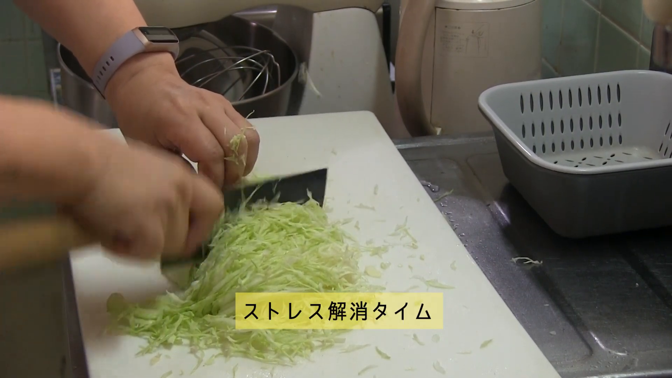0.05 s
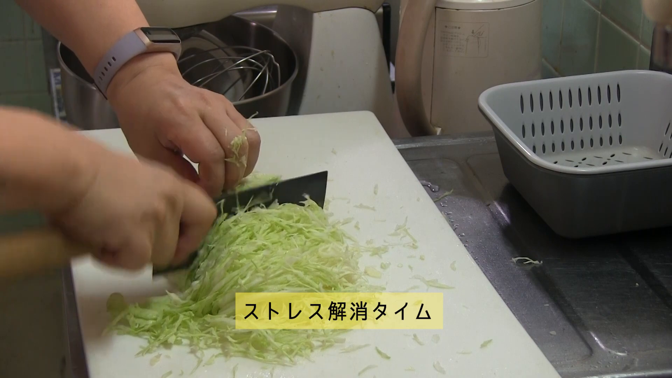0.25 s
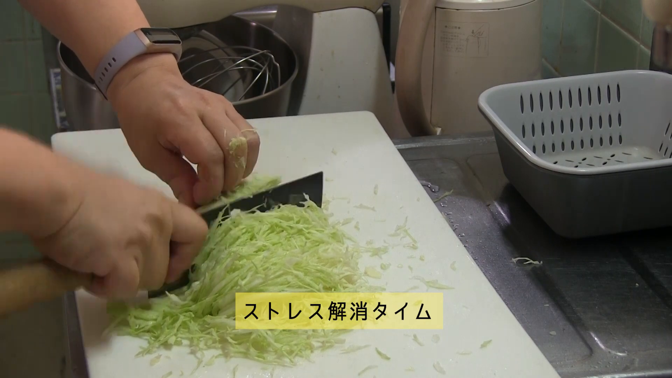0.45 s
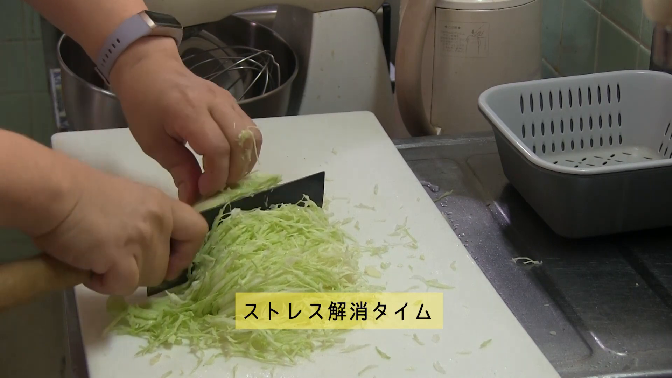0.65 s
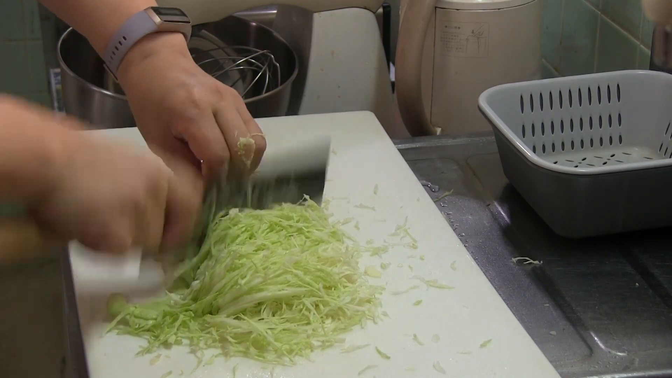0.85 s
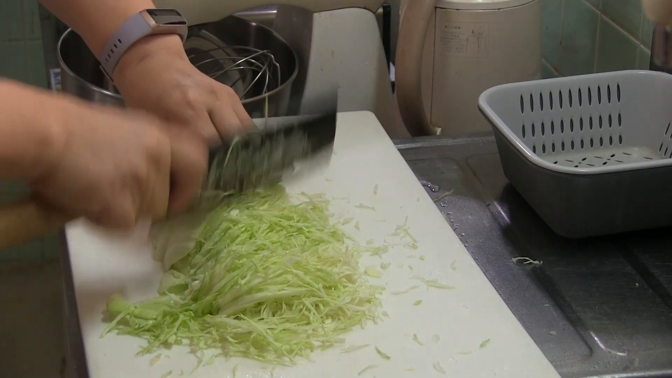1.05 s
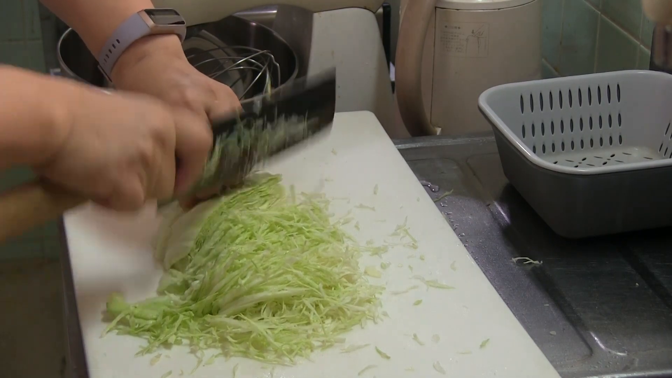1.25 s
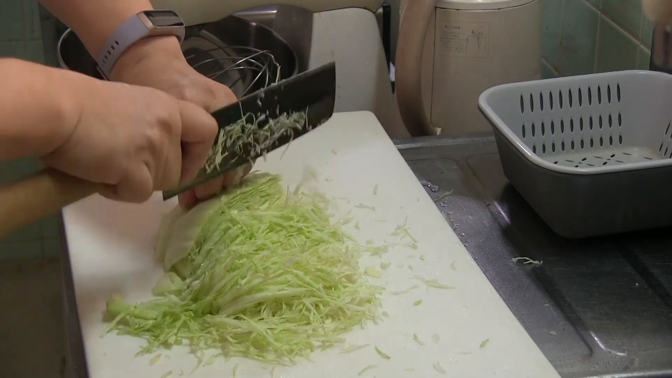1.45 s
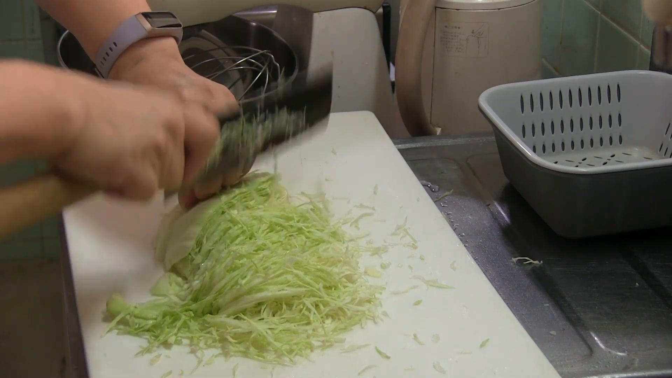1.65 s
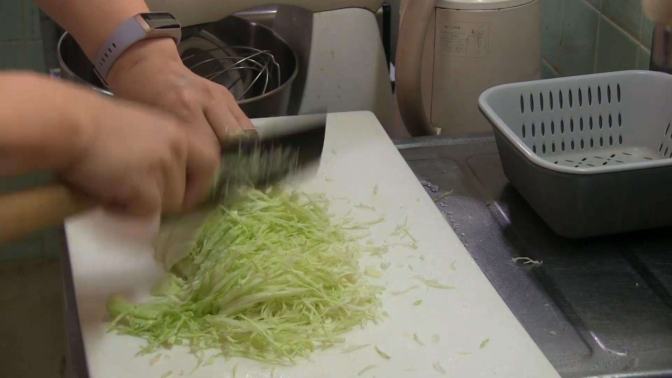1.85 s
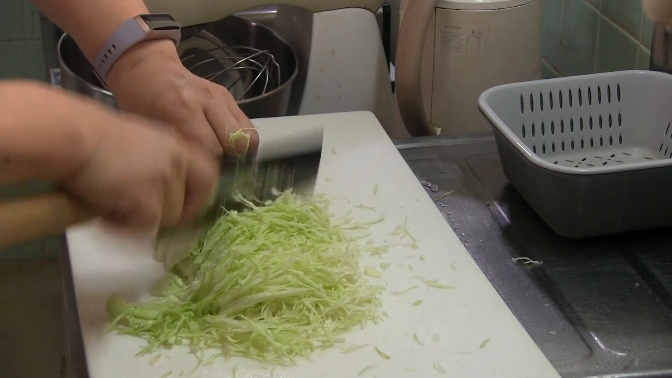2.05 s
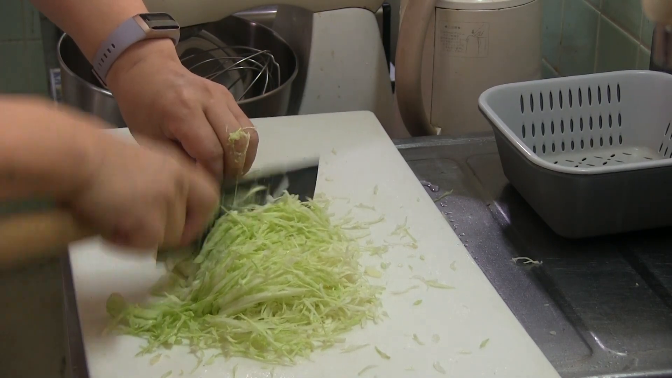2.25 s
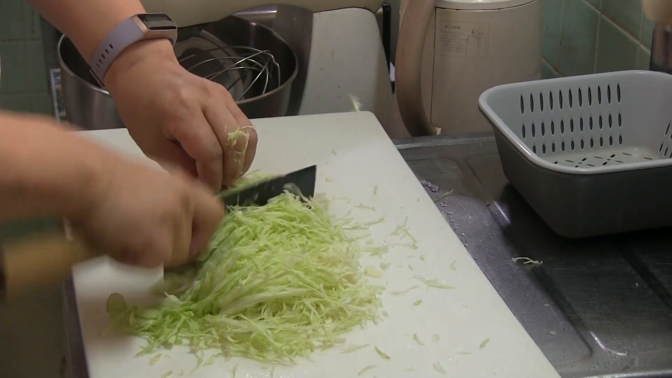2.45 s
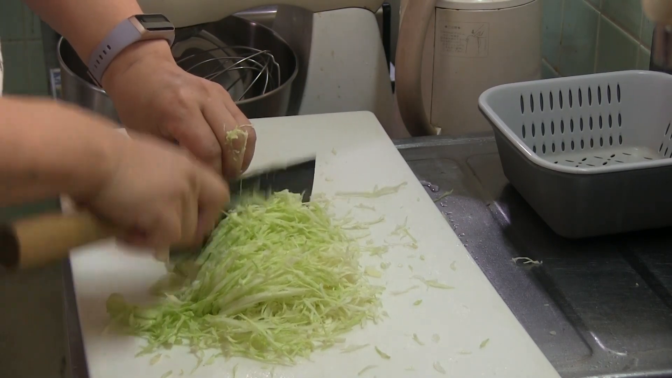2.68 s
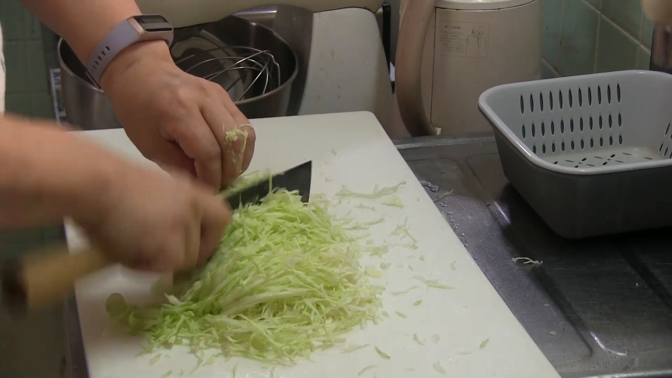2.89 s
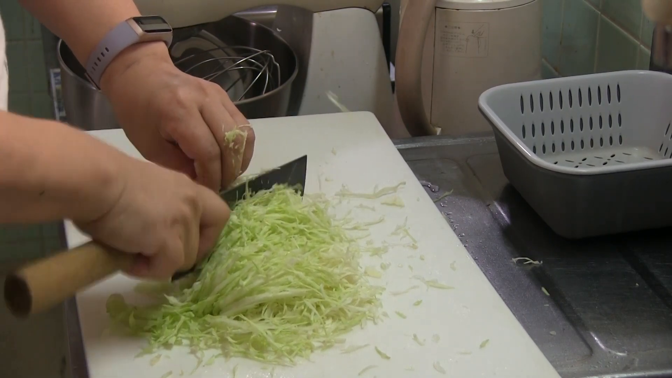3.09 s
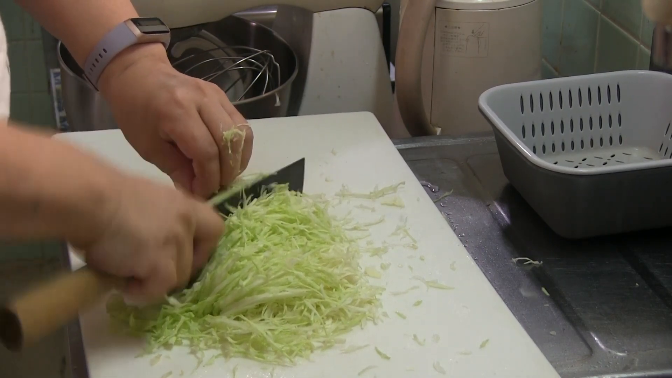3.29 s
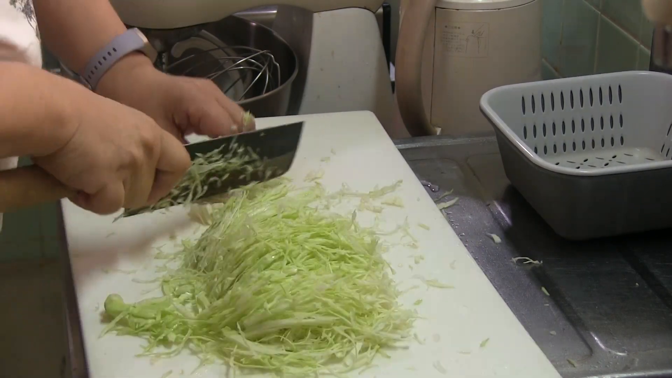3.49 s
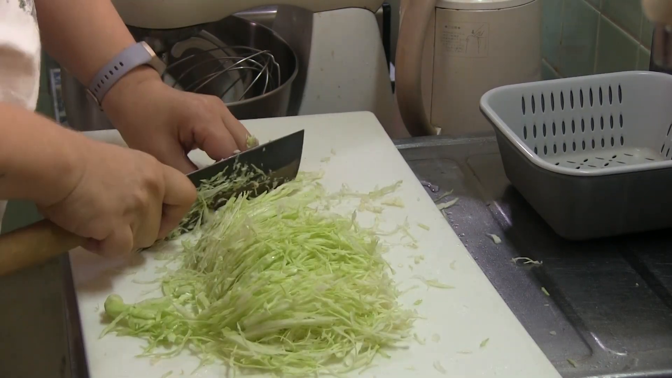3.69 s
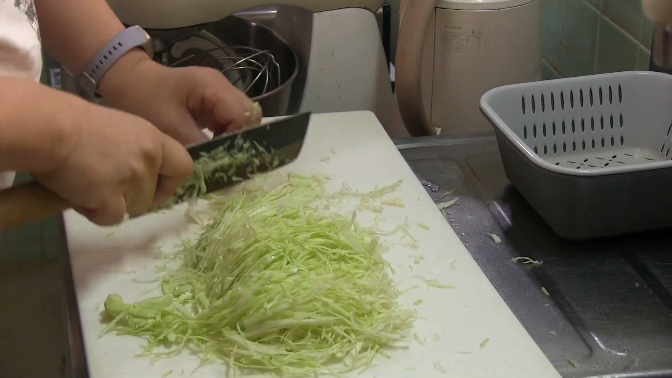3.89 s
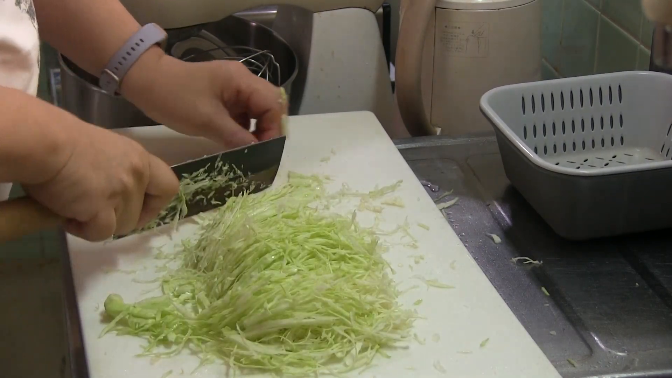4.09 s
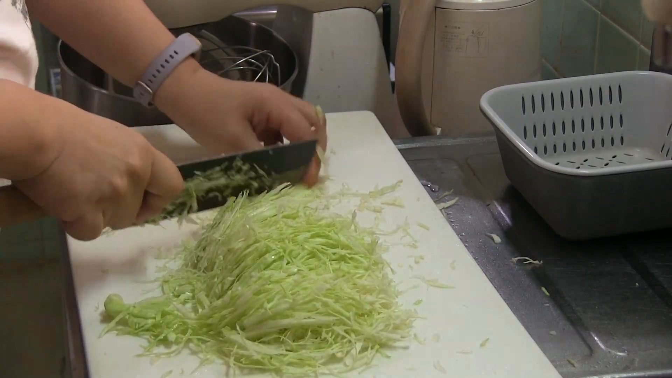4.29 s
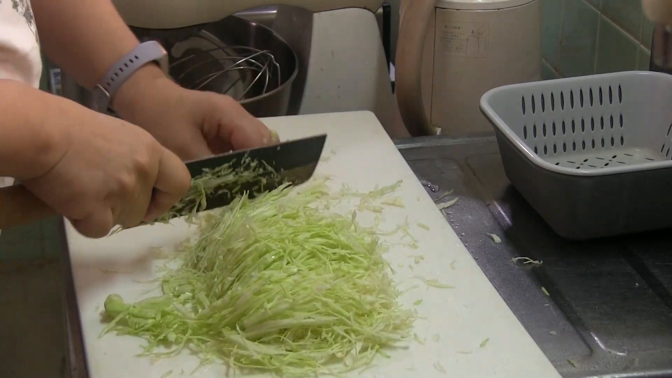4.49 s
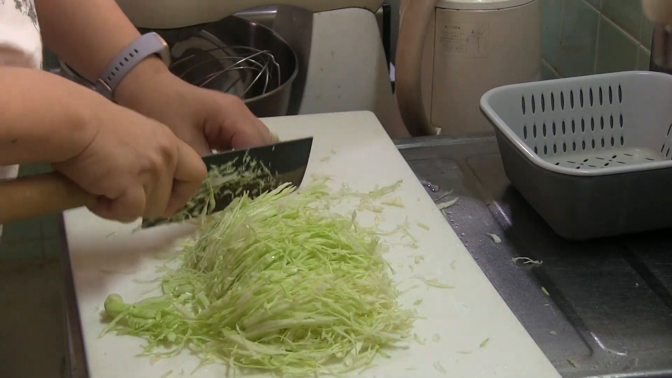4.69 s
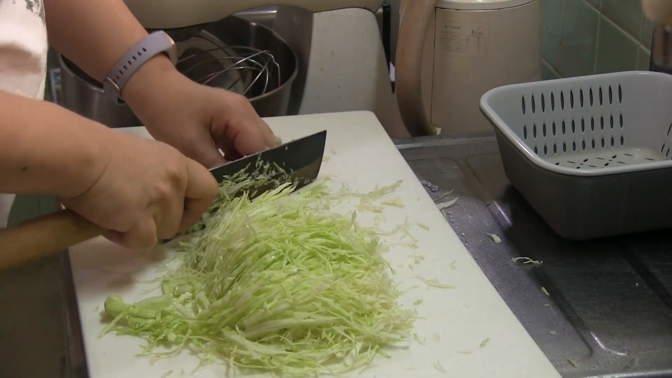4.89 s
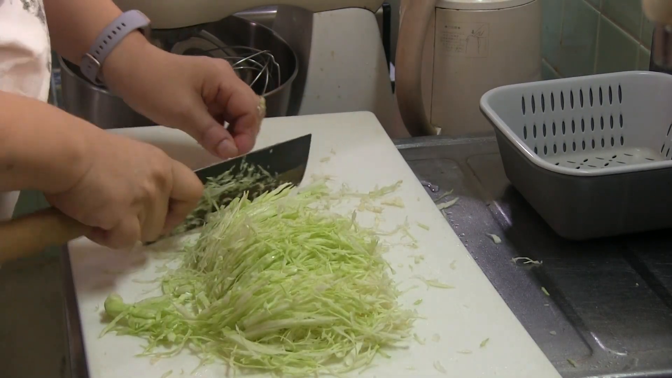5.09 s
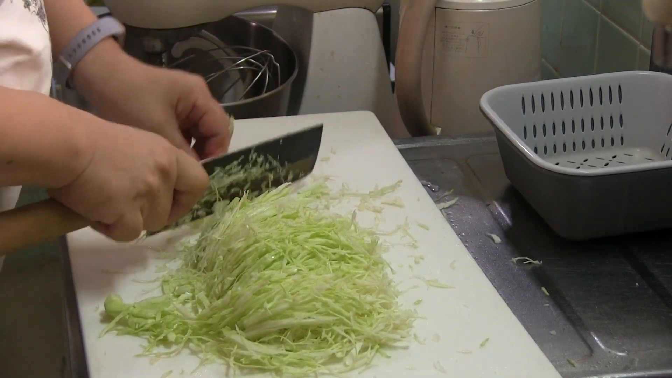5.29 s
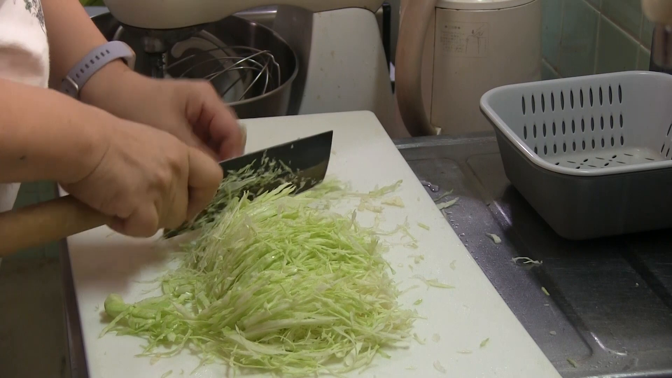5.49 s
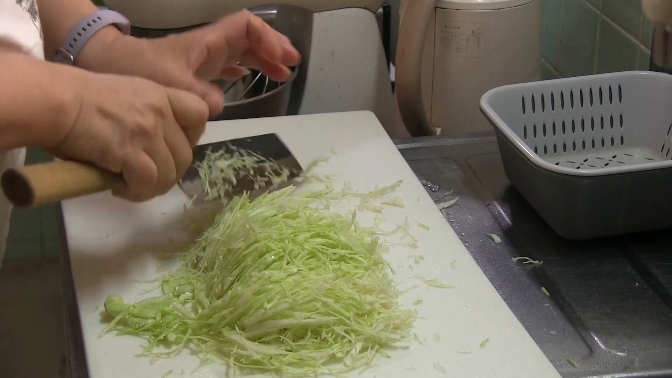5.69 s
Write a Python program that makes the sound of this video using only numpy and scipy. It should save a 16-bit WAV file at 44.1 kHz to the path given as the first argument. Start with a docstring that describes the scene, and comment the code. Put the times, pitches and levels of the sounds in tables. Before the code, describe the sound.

Close, wide stereo pickup in a small hard-walled kitchen: a broad cleaver chops cabbage at four to five strokes a second, each a short crackling crunch ending in a loud hollow plastic knock. One beat is skipped early on and one stroke stalls late. The ring is cut off abruptly, the background rises, and a few weaker knocks, soft bumps and crisp rustles follow before the room noise drops.

```python
"""A cleaver shreds cabbage on a plastic board in a small kitchen, four to five strokes a second.
Each stroke is a burst of crackling crunch, then a knock: board modes, noise chatter and an edge click.
Shreds rustle in finer crackle as the blade lifts; now and then the rubbed steel sings a wavering tone.
The chopping is cut off mid-ring; a few slower knocks and soft low bumps follow as shreds are gathered.
Shaped noise and a low hum make the background; its level steps up at the cutoff and later back down."""
import sys
import numpy as np
from scipy import signal
from scipy.fft import rfft, irfft, next_fast_len
from scipy.io import wavfile
from scipy.ndimage import uniform_filter1d

SR = 44100
rng = np.random.default_rng(int(sys.argv[2]) if len(sys.argv) > 2 else 0)


def to_wav(s):
    """Save 16-bit WAV."""
    ch = np.atleast_2d(s).T  # columns
    pcm = np.round(np.clip(ch, -1, 1) * 32767)  # PCM
    wavfile.write(sys.argv[1], SR, pcm.astype(np.int16))


N = 253124  # length in samples
CUTOFF_S = 3.456  # the sound is cut here, clipping the ring of the last stroke
CHOP_RING, HELD_RING = 0.67, 0.39  # share of the board's free ring; pressure shortens it further
CHOP_BRIGHT_DB = -0.4  # treble of a chopping knock
CHOP_CLICK_DB, HELD_CLICK_DB = -6.5, -17  # edge click over the knock, for a full cut and a held blade
FULL_CUT_DB = -31.5  # crunch level of a full cut
THIN_CUT_CLICK = 0.24  # a thin cut cushions less: dB of extra click per dB below a full cut
THIN_CUT_DULLING = 0.4  # it is also duller: dB of extra body per dB below a full cut

# strokes of the cleaver; the one at 3.205 s stalls in the leaves
# (t/s at the bottom, knock level/dB, cutting time/s, crunch level/dB)
CLEAVER_STROKES = [(-.125,-10.5,0.066,-36), (0.0962,-13.5,0.043,-38), (0.3274,-14.5,0.055,-36),
                   (0.5504,-12,0.047,-37), (0.9848,-12,0.017,-47), (1.2091,-13,.033,-42.5),
                   (1.4195,-12,0.038,-52.5), (1.639,-12.5,0.034,-38.5), (1.8953,-13.5,0.071,-34),
                   (2.0732,-12,0.023,-42.5), (2.2885,-11.5,0.029,-43.5), (2.5162,-13.5,.037,-37.5),
                   (2.752,-16.5,0.06,-36), (2.9559,-13,.034,-38.5), (3.205,-40,0.063,-32.5),
                   (3.3915,-12,0.031,-39)]
# blade set down and held against the board: (t/s, knock level/dB, brightness/dB)
HELD_KNOCKS = [(4.126,-16.3,-14), (4.8137,-20.5,-25), (5.1662,-17.5,-4)]


def chops():
    """Knocks of the blade on the board, sharing part of the walls' answer; a held blade damps the ring more."""
    out = np.zeros((2, N))
    usual = walls(ROOM_WIDTH, gap=.024)
    for bottom_s, level_db, _, crunch_db in CLEAVER_STROKES:
        click_db = CHOP_CLICK_DB + THIN_CUT_CLICK * (FULL_CUT_DB - crunch_db)
        blow = knock(usual, CHOP_RING, CHOP_BRIGHT_DB, click_db)
        add(out, bottom_s, amp(level_db) * blow)
    for start_s, level_db, bright_db in HELD_KNOCKS:
        blow = knock(usual, HELD_RING, bright_db, HELD_CLICK_DB)
        add(out, start_s, amp(level_db) * blow)
    return out


ROOM_WIDTH = .55  # side over mid in the answer to a knock
SWING_DB = 2.5  # first swing of the board, before the blow is levelled
# the board's radiation: (f/Hz, left minus right level/dB)
BOARD_LEAN = [(100, -1), (170, 3), (300, -2), (600, -2.5), (1200, 1), (2500, 1)]


def knock(usual, ring, bright_db, click_db):
    """One blow of the edge on the board with the walls' answer; rms 1 over its first 40 ms, plus the click."""
    t = clock()
    blow = board(ring, scatter_db=1.92, push_hz=847, push_db=SWING_DB) + chatter(ring)
    blow = filtered(blow, lambda f: shelf(f, 1380, bright_db) * 1j * f / (1j * f + 70))
    # part of the answer repeats at every blow, part is new
    answer = amp(-13.5) * usual + amp(-9.7) * walls(ROOM_WIDTH, gap=.028)
    blow = blow + signal.fftconvolve(blow, answer, axes=1)[:, :len(t)]
    blow = filtered(blow, lambda f: amp(stereo(0, along(BOARD_LEAN, f) / 2)))
    blow = blow / np.sqrt(np.mean(blow[:, t < .04] ** 2))

    noise = rng.standard_normal(len(t)) * amp(-60 * t / 0.011)
    click = filtered(noise, lambda f: 1 / (1 + 1j * f / 3300) / (1 + 1j * f / 14000))
    return blow + amp(click_db) * in_room(click, walls(width=0.13, gap=0.00059))


# modes of the board and the counter beneath it: (f/Hz, relative level/dB, free-ringing t60/s)
BOARD_MODES = [(145, -33, .22), (186, -27, .36), (206, -25, .19), (238, -25, .15), (282, -23, .17),
               (306, -17, .12), (344, -20, .12), (395, -35, .25), (455, -18, .11), (500, -19, .13),
               (567, -13, .12), (601, -18, .11), (652, -13, .08), (675, -16, .15), (721, -33, .11),
               (780, -15, .1), (895, -21, .07), (1010, -18, .075), (1099, -32, .08), (1165, -20, .045),
               (1236, -22, .07), (1356, -21, .06), (1455, -19, .11), (1540, -24, .05), (1640, -22, .04),
               (1860, -33, .05), (1975, -29, .06), (2420, -30, .025), (2750, -29, .045)]


def board(ring, scatter_db, push_hz, push_db):
    """A single swing of the board under the blade, then its modes, alternate ones in opposite sense."""
    t = clock()
    hz, db, t60 = np.transpose(BOARD_MODES)[:, :, None]
    size, detune = rng.standard_normal((2, len(BOARD_MODES), 1))
    sense = np.cos(np.pi * np.arange(len(BOARD_MODES)))[:, None]
    decay = amp(db + scatter_db * size - 60 * t / (ring * t60))
    tones = np.sin(2 * np.pi * hz * (1 + .003 * detune) * t)
    modes = (sense * decay * tones).sum(0)
    u = t * push_hz * np.pi * np.sqrt(2) - np.pi
    swing = -amp(push_db) * u * np.exp(-u * u)
    return modes * (1 - np.exp(-t / 0.0038)) + swing


CHATTER_DB = -16  # starting rms, before the blow is levelled
# dense ring of board and blade: (f/Hz, relative level/dB per Hz)
CHATTER_SPECTRUM = [(100, -32.5), (180, -1), (280, -4.5), (500, -2), (800, -1.5), (1500, -6), (1750, -10),
                    (2200, -15.5), (3000, -19), (4500, -30), (9000, -47.5)]


def chatter(ring):
    """Countless short-lived modes of board and blade, as decaying noise that differs at every blow."""
    t = clock()
    noise = rng.standard_normal((2, len(t)))
    mid, side = filtered(noise, lambda f: amp(along(CHATTER_SPECTRUM, f)))
    attack = 1 - np.exp(-t / 0.00045)
    decay = amp(CHATTER_DB - 60 * t / (0.18 * ring))
    return unit(stereo(mid, ROOM_WIDTH / 2 * side)) * attack * decay


# leaves giving way under the edge: (f/Hz, relative level/dB per Hz)
CRUNCH_SPECTRUM = [(40, -3), (130, 6), (250, 12), (500, 5), (1500, 8.5), (2500, 4), (4500, 2.5),
                   (8000, -1.5), (12000, -3.5), (16000, -15.5)]


def cabbage():
    """Dense crunch on the way down to every knock; thin cuts are quieter and duller."""
    out = np.zeros((2, N))
    for bottom_s, _, length, level_db in CLEAVER_STROKES:
        dull_db = THIN_CUT_DULLING * (FULL_CUT_DB - level_db)
        crunch = crackle(length, CRUNCH_SPECTRUM, rate=4500, rise=0.012)
        # lift the body and leave the top treble where it is
        crunch = filtered(crunch, lambda f: amp(dull_db) * shelf(f, 9100, -dull_db))
        answer = amp(-5.5) * walls(width=0.8, gap=0.00033)
        add(out, bottom_s - length, amp(level_db) * in_room(crunch, answer))
    return out


CELL_SPREAD_DB = 3.3  # how unequal the bursts are


def crackle(length, spectrum, rate, rise):
    """Cells burst at random, in clumps, while the blade moves; rms 1 above 5 kHz before the envelope."""
    t = clock()
    bursts = (rng.random(len(t)) < rate / SR) * rng.choice([-1, 1], len(t))
    clumps = unit(uniform_filter1d(rng.standard_normal(len(t)), size=260))
    spread = np.clip(rng.standard_normal(len(t)), -2, 2)
    cells = bursts * amp(CELL_SPREAD_DB * spread + 2 * clumps)
    colour = lambda f: amp(along(spectrum, f))
    treble = filtered(cells, lambda f: colour(f) * (f > 5000))
    stroke = np.clip(t / rise, 0, 1) * np.exp(-np.maximum(t - length, 0) / 0.002)
    return filtered(cells * stroke, colour) / treble.std()


LIFT_SHARE, LIFT_S = .37, 0.026  # the blade rises this far on to the next stroke, for this long
LIFT_DB, LIFT_BRIGHT_DB = -51.5, -11  # rustle of the lift and its treble
# loose shreds brushed by blade or fingers: (t/s, length/s, level/dB, brightness/dB)
BRUSHED_SHREDS = [(0.858,0.031,-54.5,-10), (1.058,0.013,-42.5,-13), (3.652,0.011,-47,3), (3.715,.04,-59,13),
                  (3.75,0.045,-46,12), (4.119,0.01,-49.5,5), (4.807,0.052,-51,7), (4.85,.056,-48,2),
                  (5.183,0.013,-44.5,9), (5.433,.011,-43.5,2.5)]
# colour of the rustle before brightness: (f/Hz, relative level/dB per Hz)
SHRED_SPECTRUM = [(100, 6), (400, 0), (1500, 2), (2500, -5.5), (4500, -5.5), (8000, -7), (12000, -9),
                  (16000, -20)]


def shreds():
    """Loose shreds crackle finely as the blade lifts between strokes, and when they are gathered."""
    out = np.zeros((2, N))
    times = [stroke[0] for stroke in CLEAVER_STROKES]
    lifts = []
    for bottom_s, following in zip(times, times[1:]):
        lift_s = bottom_s + LIFT_SHARE * (following - bottom_s)
        lifts.append((lift_s, LIFT_S, LIFT_DB, LIFT_BRIGHT_DB))
    for start_s, length, level_db, bright_db in lifts + BRUSHED_SHREDS:
        rustle = crackle(length, SHRED_SPECTRUM, rate=3400, rise=0.0067)
        rustle = filtered(rustle, lambda f: shelf(f, 9200, bright_db))
        add(out, start_s, amp(level_db) * in_room(rustle, walls(width=0.51, gap=0.00065)))
    return out


# soft bumps on the board: (t/s, relative level/dB)
SOFT_BUMPS = [(3.805, -10), (3.82, -13), (4.86, -8.5), (4.922, -12)]


def bumps():
    """Soft contact wakes only the low modes of the board."""
    out = np.zeros((2, N))
    for start_s, level_db in SOFT_BUMPS:
        thud = board(ring=.6, scatter_db=3, push_hz=260, push_db=4)
        thud = filtered(thud, lambda f: (1j * f / (1j * f + 80)) ** 2 / (1 + 1j * f / 340) ** 2)
        answer = amp(-3.5) * walls(width=0.11, gap=0.014)
        add(out, start_s, amp(level_db) * in_room(thud, answer))
    return out


# the steel sings as it rubs the leaves: (t/s, f/Hz, level/dB)
STEEL_SINGS = [(.862, 4520, -53), (1.092, 4500, -49)]


def blade():
    """A thin, wavering note of the rubbed steel: a swelling and fading sine with randomly drifting phase."""
    out, t = np.zeros((2, N)), clock()
    for start_s, hz, level_db in STEEL_SINGS:
        phase = 2 * np.pi * hz * t + 0.077 * np.cumsum(rng.standard_normal(len(t)))
        u = t / .016  # the swell peaks at 16 ms
        note = amp(level_db) * u * np.exp(1 - u) * np.sin(phase)
        add(out, start_s, in_room(note, amp(-9) * walls(width=0.55, gap=0.0038)))
    return out


BACKGROUND_DB, SECTION_RISE_DB = -48, 5  # the steady rush, and its step up at the cutoff
SECTION_END_S = 5.14  # it steps back down here
# rush of the kitchen: (f/Hz, relative level/dB per Hz)
RUSH_SPECTRUM = [(20, -12), (60, -2), (85, -11.5), (130, -2.5), (280, -2), (500, -5.5), (900, -10),
                 (1500, -15.5), (2300, -19), (4500, -28), (8000, -30), (12000, -35), (16000, -39)]


def background():
    """Steady noise rush with a low, slightly unsteady appliance hum; both are louder in the middle section."""
    t = np.arange(N) / SR
    noise = rng.standard_normal((2, N))
    mid, side = filtered(noise, lambda f: amp(along(RUSH_SPECTRUM, f)))
    # the lows are narrower than the highs
    side = 0.49 * filtered(side, lambda f: (f + 80) / (f + 250))
    rush = unit(stereo(mid, side))
    waver = unit(filtered(rng.standard_normal(N), lambda f: 1 / (1 + (f / 2) ** 4)))
    hum = unit(np.sin(2 * np.pi * 59 * t + .35 * waver) * amp(1.5 * waver))
    section = ((t > CUTOFF_S) & (t < SECTION_END_S)).astype(float)
    section = uniform_filter1d(section, size=1500)
    return amp(BACKGROUND_DB + SECTION_RISE_DB * section) * (rush + amp(-10.5) * hum)


WIDE_ABOVE_HZ = 340  # the walls answer alike in both channels below this
# how fast the kitchen's answer dies: (f/Hz, t60/s)
KITCHEN_DECAY = [(100, 0.47), (260, 0.25), (700, 0.27), (1800, 0.25), (5000, 0.29), (14000, 0.22)]


def walls(width, gap):
    """The kitchen's answer: noise that builds up over the gap, each frequency dying at its own speed."""
    t = clock()
    hz, when, z = signal.stft(rng.standard_normal((2, len(t))), SR, nperseg=256)
    decay = amp(-60 * when / along(KITCHEN_DECAY, hz)[:, None])
    tail = signal.istft(z * decay, SR, nperseg=256)[1][:, :len(t)]
    tail = tail * (1 - np.exp(-(t / gap) ** 2))
    mid, side = tail / np.linalg.norm(tail, axis=1, keepdims=True)
    side = filtered(side, lambda f: 1 - 1 / (1 + (f / WIDE_ABOVE_HZ) ** 4))
    return stereo(mid, width * side)


def in_room(x, answer):
    """Direct sound plus the answer of the walls."""
    return x + signal.fftconvolve(x[None], answer, axes=1)[:, :len(x)]


def add(track, s, sound):
    """Lay a sound on the track; what starts before the cutoff ends there."""
    start = round(s * SR)
    sound, start = sound[:, max(-start, 0):], max(start, 0)
    limit = round(CUTOFF_S * SR) if s < CUTOFF_S else N
    end = min(start + sound.shape[-1], limit, N)
    fade = np.clip(np.arange(end - start)[::-1] / 64, 0, 1)
    track[:, start:end] += sound[:, :end - start] * fade


def stereo(mid, side):
    """Left and right from mid and side."""
    return np.array([mid + side, mid - side])


def clock():
    """Half-second time axis of one event."""
    return np.arange(SR // 2) / SR


def amp(db):
    """Amplitude factor of a level in dB."""
    return 10 ** (np.asarray(db) / 20)


def unit(x):
    """Scale to rms 1."""
    return x / np.sqrt(np.mean(x ** 2) + 1e-20)


def along(points, hz):
    """Interpolate (f/Hz, value) points on a log frequency axis."""
    f, v = np.transpose(points)
    return np.interp(np.log(hz + 1), np.log(f + 1), v)


def filtered(x, response):
    """Shape the spectrum of x by a real or complex response of frequency."""
    n = x.shape[-1]
    m = next_fast_len(n + 8192)
    return irfft(rfft(x, m) * response(np.fft.rfftfreq(m, 1 / SR)), m)[..., :n]


def shelf(f, corner_hz, db):
    """Causal response: flat below the corner, db above it."""
    s = 1j * f / corner_hz
    g = amp(db / 2)
    return (1 + np.sqrt(2 * g) * s + g * s * s) / (1 + np.sqrt(2 / g) * s + s * s / g)


def scene():
    """Cleaver, cabbage and kitchen together."""
    return chops() + cabbage() + shreds() + bumps() + blade() + background()


TOP_HZ = 16000  # band limit


def record(dry):
    """The hardest peaks are rounded off at full scale; nothing passes above the band limit."""
    rounded = dry / (1 + np.abs(dry) ** 8) ** (1 / 8)
    return filtered(rounded, lambda f: f < TOP_HZ)


dry = scene()
out = record(dry)
to_wav(out)
```